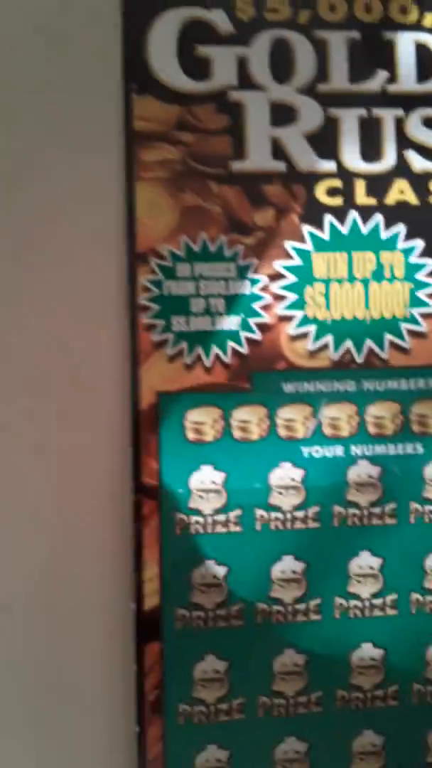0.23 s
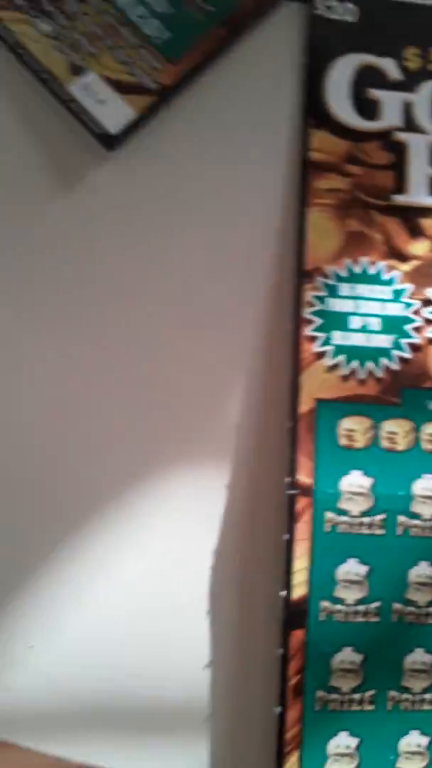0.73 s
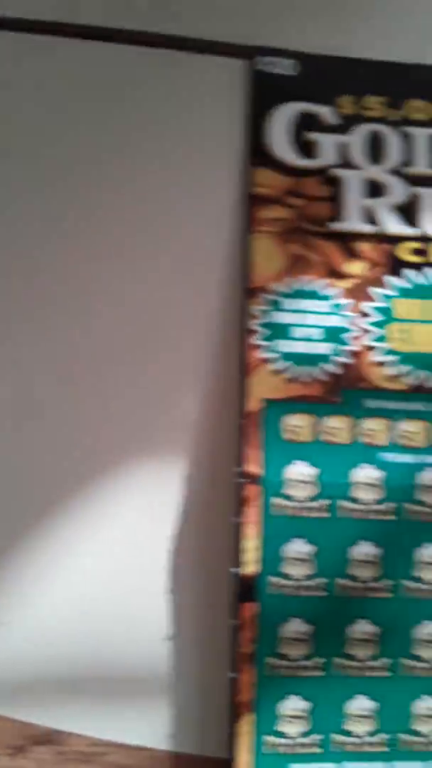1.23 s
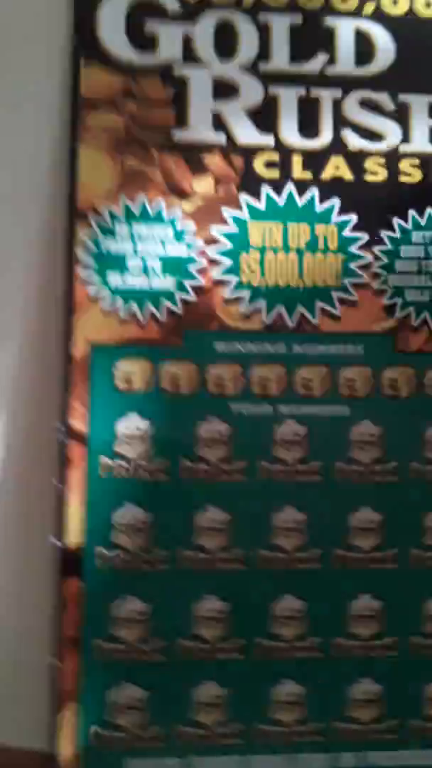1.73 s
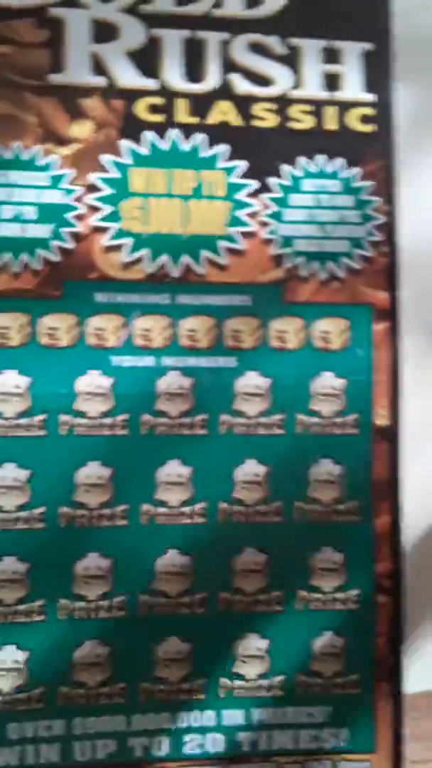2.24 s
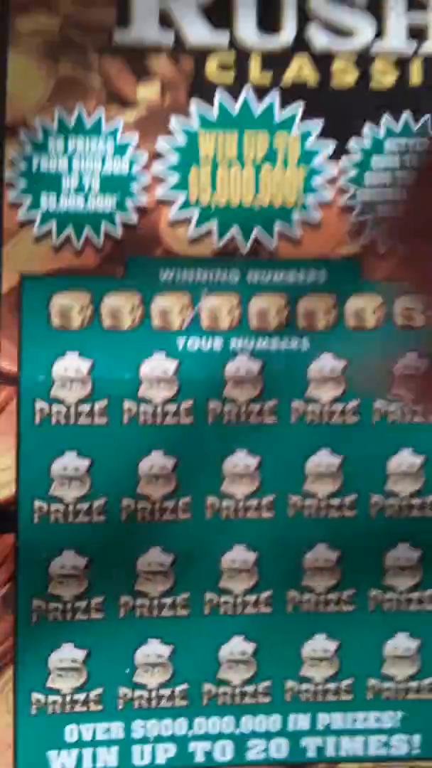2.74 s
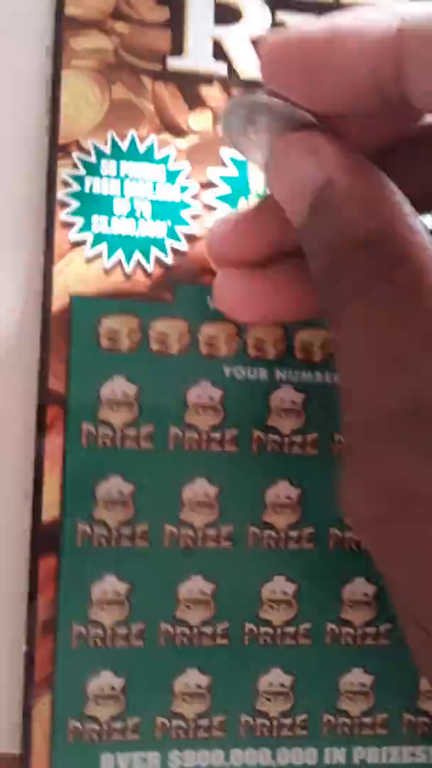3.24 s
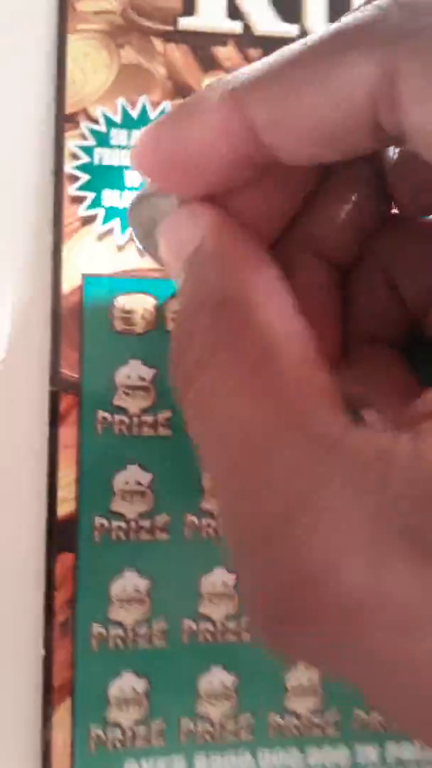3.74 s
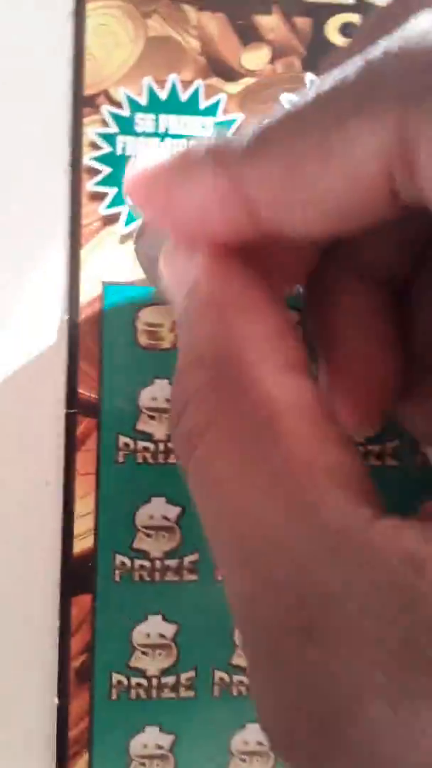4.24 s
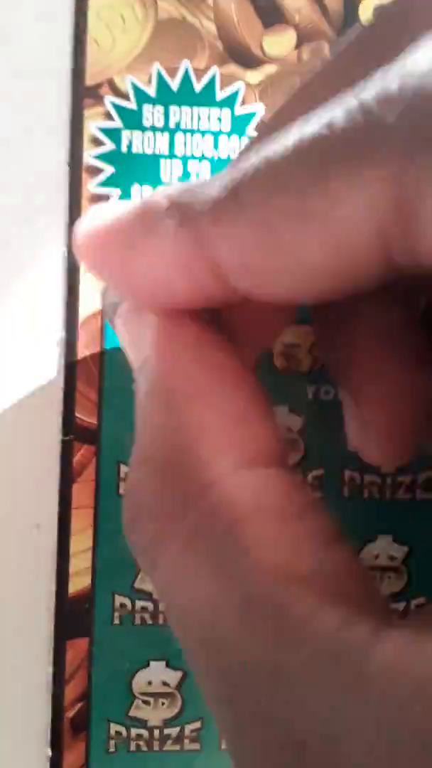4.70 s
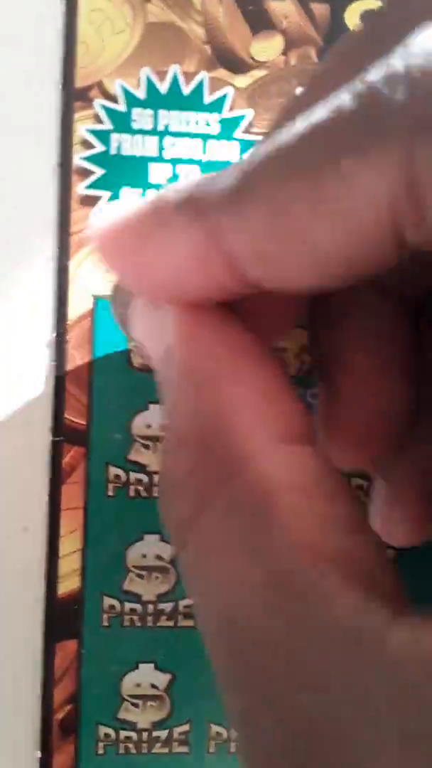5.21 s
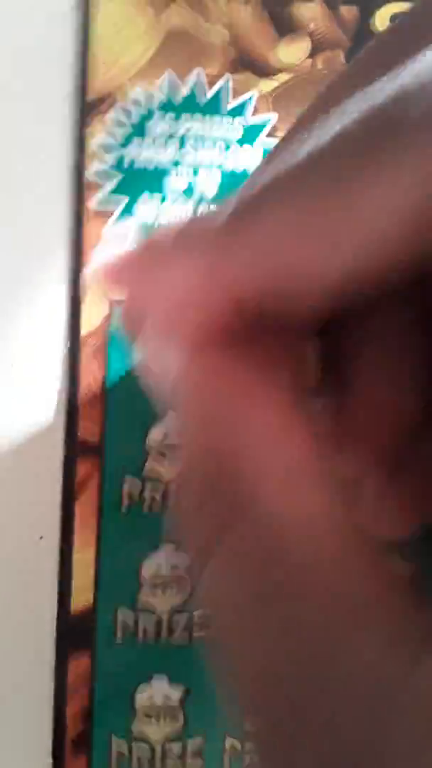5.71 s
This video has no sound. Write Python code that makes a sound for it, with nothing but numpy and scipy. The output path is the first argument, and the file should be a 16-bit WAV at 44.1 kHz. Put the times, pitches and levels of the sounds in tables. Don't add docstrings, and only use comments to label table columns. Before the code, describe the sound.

Close card handling with a loud crackly slide, a distant metallic knock, then rapid gritty coin scraping over a faint low room hum.

```python
import sys
import numpy as np
from scipy import signal
from scipy.fft import rfft, irfft
from scipy.io import wavfile
from scipy.ndimage import uniform_filter1d

SR = 44100
rng = np.random.default_rng(int(sys.argv[2]) if len(sys.argv) > 2 else 0)


def inscribe(sig):
    pcm = np.round(np.clip(np.atleast_2d(sig).T, -1, 1) * 32767)
    wavfile.write(sys.argv[1], SR, pcm.astype(np.int16))


def decibels_to_gain(level_db):
    exponent = np.asarray(level_db, float) / 20
    return 10 ** exponent


N = 262880


def evened(x):
    return x / np.sqrt(np.mean(x ** 2) + 1e-20)


def read(points, hz):
    f, value = np.transpose(points)
    return np.interp(np.log(hz + 1), np.log(f + 1), value)


def add(mix, s, sound):
    part = mix[..., round(s * SR):][..., :sound.shape[-1]]
    part += sound[..., :part.shape[-1]]


def panned(db):
    return decibels_to_gain([[db / 2], [-db / 2]])


def bands(x, spectrum, edges_hz):
    hz = np.fft.rfftfreq(x.shape[-1], 1 / SR)
    below = [0 * hz] + [1 / (1 + (hz / e) ** 30) for e in edges_hz] + [1 + 0 * hz]
    z = rfft(x) * decibels_to_gain(read(spectrum, hz))
    return [evened(irfft(z * np.sqrt(abs(b - a)), x.shape[-1])) for a, b in zip(below, below[1:])]


def follow(x, hz, width):
    turn = np.exp(2j * np.pi * np.cumsum(hz + np.zeros(x.shape[-1])) / SR)
    r = np.exp(-np.pi * width / SR)
    return (turn * signal.lfilter([np.sqrt(1 - r * r)], [1, -r], x / turn)).real


def hollow(x, hz, width):
    return follow(follow(x, hz, width), hz, width)


def ring(x, modes):
    out = np.zeros((2, len(x)))
    for hz, width, db, pan_db, lag in modes:
        pole = np.exp((2j * np.pi * hz - 1.5 * np.pi * width) / SR)
        z = signal.lfilter([(1 - abs(pole)) ** 2], [1, -2 * pole, pole ** 2], x + 0j) * decibels_to_gain(db)
        left, right = z.imag, (z * np.exp(-1j * lag)).imag
        out += [left * decibels_to_gain(pan_db / 2), right / decibels_to_gain(pan_db / 2)]
    return out


def grit(per_s, spread_db, lumps_db, lump_ms):
    clicks = (rng.random(N) < per_s / SR) * rng.standard_normal(N)
    clicks *= decibels_to_gain(spread_db * np.minimum(rng.exponential(1, N), 4))
    lump = signal.windows.hann(max(round(lump_ms * SR / 1000), 3))
    lumps = evened(signal.oaconvolve(rng.standard_normal(N), lump, "same"))
    return evened(clicks * decibels_to_gain(lumps_db * lumps))


def swell(peak_s, rise_ms, fall_ms, db):
    t = np.arange(-2 * rise_ms, 2 * fall_ms, 1000 / SR)
    t = t[t >= -1000 * peak_s]
    return peak_s + t[0] / 1000, db - 20 * np.maximum(-t / rise_ms, t / fall_ms)


# (frequency [Hz], likeness [0-1])
LIKENESS = [(60, 1), (150, 0.89), (290, 0.57), (600, 0.18), (2000, 0)]


def paired(z1, z2, hz):
    same = np.clip(read(LIKENESS, hz), 0, 1)
    return np.array([z1, same * z1 + np.sqrt(1 - same ** 2) * z2])


# (frequency [Hz], density [dB per Hz])
HISS = [(24, -36.5), (40, -23.5), (110, -8.5), (200, -15), (320, -19), (600, -20.5), (1200, -27),
        (2500, -29.5), (4400, -33), (7000, -42), (8700, -36), (10500, -38), (14000, -32), (15800, -33)]
# (frequency [Hz], width [Hz], level [dB rms])
DUCT = [(56, 7.7, -72), (99.7, 7.74, -73.5), (150.6, 20.4, -74)]
# (time [s], level [dB])
DUCT_TONE = [(0.0, -53.5), (0.2, -51), (0.3, -62), (0.8, -55), (1.31, -66), (2.39, -56.5), (2.61, -68),
             (2.67, -55.5), (3.1, -90), (3.27, -55.5), (3.39, -87), (3.5, -59), (3.93, -59.5),
             (3.97, -68.5), (5.0, -57.5), (5.26, -69), (5.29, -57.5), (5.96, -59.5)]


def floor():
    hiss_db, tone_hz, waver_hz, waver_db = -64, 142.7, 3.76, 2.4
    hz = np.fft.rfftfreq(N, 1 / SR)
    a, b, c, d = rng.standard_normal((4, len(hz)))
    z = paired(a + 1j * b, c + 1j * d, hz)
    hiss = z * decibels_to_gain(read(HISS, hz))
    hiss *= decibels_to_gain(hiss_db) / np.std(irfft(hiss * (hz > 300), N))
    hum = sum(decibels_to_gain(db) * evened(irfft(z / (1 + 4 * ((hz - f) / w) ** 2), N)) for f, w, db in DUCT)
    waver = uniform_filter1d(rng.standard_normal(N), size=1500)
    waver = evened(uniform_filter1d(waver, size=1500))
    tone = np.sqrt(2) * np.sin(2 * np.pi * np.cumsum(tone_hz + waver_hz * waver) / SR)
    s, db = np.transpose(DUCT_TONE)
    tone_db = np.interp(np.arange(N) / SR, s, db) + waver_db * np.roll(waver, N // 2)
    return irfft(hiss, N) + (hum + tone * decibels_to_gain(tone_db)) * panned(2.2)


# (peak time [s], rise [ms], fall [ms], level [dB], fine hiss over it [dB])
RUBS = [(0.002, 18, 42, -41, -4.5), (0.032, 54, 27, -47.5, 0), (0.1, 92, 49, -48.5, -1.5),
        (0.25, 240, 250, -62, -11), (0.304, 23, 26, -51.5, -16), (1.831, 26, 48, -51, -8),
        (1.904, 15, 190, -57.5, -12), (2.112, 35, 41, -61.5, -6), (2.288, 230, 550, -64.5, -19),
        (2.76, 260, 200, -63.5, -8.5), (2.918, 52, 130, -73, 6.5), (3.101, 34, 83, -63, -4),
        (3.274, 53, 110, -59, -14), (3.33, 75, 94, -63.5, 4), (3.396, 110, 27, -59, -12)]
# (peak time [s], rise [ms], fall [ms], level [dB], fine hiss over it [dB], hollow [Hz])
WHISKS = [
    (0.161, 7, 95, -54, 6.5, 6500),
    (0.255, 62, 55, -60, 1, 5900),
    (0.738, 14, 24, -54, 0, 7000),
    (2.112, 35, 14, -57.5, -6, 4800),
    (2.15, 25, 18, -68.5, 3, 4300),
    (2.278, 12, 20, -75, 8, 6000),
]
# (time [s], fall [ms], level [dB], fine hiss over it [dB], hollow [Hz])
CATCHES = [
    (0.724, 39, -39, -3, 3550),
    (0.749, 18, -49, -2, 3500),
    (0.762, 92, -56, -16, 3550),
    (0.988, 17, -32, -3.5, 6300),
    (1.118, 29, -34, -16, 2250),
    (0.918, 29, -32, -8.5, 2680),
    (0.943, 41, -30, -5.5, 2620),
]
# (time [s], level [dB], hollow [Hz])
SLIDE = [
    (0.819, -54.5, 3640),
    (0.866, -42, 3550),
    (0.91, -46.5, 3230),
    (0.978, -41.5, 3500),
    (0.986, -31, 4470),
    (1.027, -27.5, 5900),
    (1.065, -26, 6360),
    (1.151, -34, 3520),
    (1.225, -51.5, 4010),
]
# (thud [dB], low-mid [dB], hollow [dB], thud and low-mid growth [dB per dB])
HELD, CAUGHT, DRAGGED = (-10.5, -9.5, -20, 1), (-21, -26, -6, 0.5), (-18, -13, -23, 0.7424)
BRUSHED = (-20, -28, -0.5, 6)


def moves():
    grip_hz, catch_rise_ms = 3700, 1.7 / 2
    out = [(*swell(s, rise, fall, db), grip_hz, fine, HELD) for s, rise, fall, db, fine in RUBS]
    out += [(*swell(s, rise, fall, db), hz, fine, BRUSHED) for s, rise, fall, db, fine, hz in WHISKS]
    out += [(*swell(s, catch_rise_ms, fall, db), hz, fine, CAUGHT) for s, fall, db, fine, hz in CATCHES]
    s, db, hz = np.transpose(SLIDE)
    t = np.arange(s[0], s[-1], 1 / SR)
    hz = np.interp(t, s, hz)
    fine_db = -10.5 + 3.54 * (hz / 1000 - 3.5)
    return out + [(s[0], np.interp(t, s, db), hz, fine_db, DRAGGED)]


# (frequency [Hz], density [dB per Hz])
RUSTLE_COLOUR = [(88, -20.5), (150, -18), (209, -28), (398, -16), (637, -21.5), (923, -10.5), (1040, -15.5),
                 (1310, -13), (1530, -18.5), (1780, -13.5), (1960, -1), (3550, 3.5), (6640, 1), (8230, -19),
                 (11500, -18.5), (16000, -25.5)]


def rustle():
    shared = grit(12000, 0.5, 3.8, 13.6)
    rub = np.array([np.roll(shared, lag) + 2.2 * grit(12000, 0.294, 0.71, 12.2) for lag in (0, 24)])
    thud, low, body, fine = bands(rub, RUSTLE_COLOUR, [600, 1750, 7900])
    out = np.zeros((2, N))
    for s, db, hz, fine_db, (thud_db, low_db, hollow_db, growth) in moves():
        at = slice(round(s * SR), round(s * SR) + len(db))
        mix = 0.7 * body[:, at] + decibels_to_gain(hollow_db) * evened(hollow(body[:, at], hz, 1000))
        under = decibels_to_gain((growth - 1) * (db + 50))
        mix += (thud[:, at] * decibels_to_gain(thud_db) + low[:, at] * decibels_to_gain(low_db)) * under
        mix += fine[:, at] * decibels_to_gain(fine_db)
        add(out, s, mix * decibels_to_gain(db) * signal.windows.tukey(len(db), 200 / len(db)))
    return out * panned(3)


def cracks(rows, breadth, edge_db, fade_ms, longer):
    out, t = np.zeros((2, N)), np.arange(2048) / SR
    for s, db, hz, low_db, pan_db in rows:
        ms = fade_ms * decibels_to_gain(longer * (db + 40))
        crack = rng.standard_normal((2, 2048)) * np.exp(-t * 1000 / ms) * (1 - np.exp(-t * 2500))
        edge = signal.lfilter([1, 0, -1], [1], crack) * decibels_to_gain(edge_db)
        crack = 1.17 * hollow(crack, hz, breadth * hz) + edge
        push = np.sin(2 * np.pi * 700 * t) * np.exp(-t / 0.00045)
        add(out, s, decibels_to_gain(db) * (crack / abs(crack).max() * panned(pan_db) + decibels_to_gain(low_db) * push))
    return out * decibels_to_gain(2.0)


# (time [s], peak [dB], centre
# [Hz], low push over it [dB], left-right [dB])
SNAPS = [(0.0314, -41.5, 3420, 7, 14), (0.2955, -34, 6050, -13, 5), (0.7235, -36, 3420, -35, 19),
         (0.7544, -41, 3470, -9, 17), (0.9192, -29.5, 2480, -47, 7), (0.9425, -29, 2550, -42.5, 11),
         (0.9873, -21, 6400, -41.5, 2), (1.0579, -13, 6460, -45, -1), (1.1181, -24, 2390, -38.5, -5),
         (1.2394, -40, 4430, 5, -10), (0.2957, -39, 2500, -1, 5), (1.3855, -46, 2000, 10, 0),
         (1.5085, -44, 2600, -2.5, 1.5), (1.824, -40, 1505, -0.5, 5.5), (1.9054, -39.5, 2040, 1.5, -3),
         (1.9345, -45, 3520, -28, -2), (3.0943, -49, 2970, 4.5, -3), (3.271, -49.5, 3280, -11, 8.5),
         (3.2805, -44, 4130, -12, -6), (3.5216, -46.5, 6200, -26, 5)]


def snaps():
    return cracks(SNAPS, breadth=0.46, edge_db=-12.0, fade_ms=2.3, longer=0.34)


def boom(rows, modes, rise_ms):
    mode, level = evened(ring(rng.standard_normal(N), modes)), np.zeros(N)
    for s, db, fall_ms in rows:
        start, line_db = swell(s, rise_ms, fall_ms, db)
        add(level, start, decibels_to_gain(line_db))
    return mode * level


# (peak time [s], level [dB], fall [ms])
ROCKS = [(0.038, -40.5, 51), (0.126, -48.5, 80), (0.3, -58, 37), (4.368, -57.5, 68), (4.54, -56.5, 94),
         (4.71, -54, 200), (4.89, -57.5, 60), (5.058, -53, 78), (5.2, -59, 110), (5.3, -67, 61),
         (5.4, -59.5, 230), (5.576, -48.5, 46), (5.756, -47, 44), (5.94, -48, 31)]
# (peak time [s], level [dB], fall [ms])
BUMPS = [
    (0.035, -43.5, 41),
    (0.775, -53.5, 25),
    (0.868, -49.5, 45),
    (0.925, -54.5, 22),
    (1.02, -48.5, 23),
    (1.115, -54.5, 44),
    (1.83, -59.5, 67),
    (0.3, -55, 38),
    (3.25, -63.5, 32),
    (4.15, -52, 56),
]


def table_top():
    rock = boom(ROCKS, [(297, 84, 0, 8.3, 1.0)], rise_ms=56)
    return rock + boom(BUMPS, [(453, 350, 0.0043, 2.4, 0.55), (255, 41, 0.0063, 1.8, 0.37)], rise_ms=20)


# (time [s], level [dB], pitch [Hz])
SQUEAK = [
    (0.16, -72, 3320),
    (0.18, -58, 3400),
    (0.215, -56, 3550),
    (0.232, -65, 3360),
    (0.25, -56, 3240),
    (0.29, -65, 3280),
]


def squeak():
    s, db, hz = np.transpose(SQUEAK)
    t, out = np.arange(s[0], s[-1], 1 / SR), np.zeros((2, N))
    whistle = hollow(rng.standard_normal((2, len(t))), np.interp(t, s, hz), 280)
    add(out, s[0], evened(whistle) * decibels_to_gain(np.interp(t, s, db)))
    return out


# (time [s], peak [dB], centre [Hz], low push over it [dB], left-right [dB])
TICKS = [
    (0.1989, -38, 11800, -31, 16),
    (0.6215, -41, 13400, -30.5, 11),
    (5.4874, -49, 7600, -1, 5),
    (5.7275, -34, 13320, -14, -1),
    (5.8894, -43, 11370, 1, 1),
]


def ticks():
    return cracks(TICKS, breadth=0.88, edge_db=-17.0, fade_ms=0.65, longer=0.05)


# (time [s], peak [dB], dull modes over main [dB], bright modes over main [dB], left-right [dB])
CLICKS = [
    (3.8093, -25.5, -5, -5, 7.5),
    (5.8725, -25, -28, -3.5, -6),
    (5.6605, -38, -16, 6.5, 5),
    (0.71, -37, -4.5, 0, 6.5),
    (1.5, -46.5, 8, -8, 4),
    (1.9065, -42, 4.5, -8, 3),
    (5.5323, -49, -4, -10, 4),
    (5.4276, -48, 5, -8, 3),
]
# (frequency [Hz], width [Hz], level [dB], left-right [dB], right side's lag [rad])
CLICK_MAIN = [(5800, 460, -7.5, 0, .5), (6430, 740, 3, 0, .7), (7180, 360, -4.5, 0, 1)]
CLICK_DULL = [(2000, 700, -10, 0, .3), (2800, 500, -5.5, 0, 0.43), (4040, 700, 1, 0, .6)]
CLICK_BRIGHT = [(9500, 810, 0, 0, 0.89), (11740, 1100, 1, 0, 1), (14400, 1500, -3, 0, 2)]


def clicks():
    out, kick = np.zeros((2, N)), signal.unit_impulse(512)
    rings = [ring(kick, modes) for modes in (CLICK_MAIN, CLICK_DULL, CLICK_BRIGHT)]
    main, dull, bright = [v / abs(v).max() for v in rings]
    for s, db, dull_db, bright_db, pan_db in CLICKS:
        click = main + dull * decibels_to_gain(dull_db) + bright * decibels_to_gain(bright_db)
        add(out, s, click * decibels_to_gain(db - 6) * panned(pan_db))
    return out


# (time [s], peak [dB], centre [Hz], low push over
# it [dB], left-right [dB])
FLAKES = [(5.256, -50, 2800, -30, 3), (5.3513, -50, 2800, -28, 2), (8.5, -48.5, 2700, -32, 5),
          (4.9, -54, 2800, -30, -3), (5.5323, -54, 3600, -30, 4), (5.4465, -50, 2810, -27, 3),
          (6.8, -44, 3100, -33, 6), (3.7, -54, 3200, -30, 0), (3.8105, -42.5, 4700, -27.5, 5.5),
          (4.4368, -48, 3300, -30, 2), (3.6, -48, 3600, -28, 5), (6.1, -44, 2700, -30, 12),
          (5.3, -48, 3040, -30, 5), (5.0909, -47, 2850, -30, 1), (6.7, -47, 3400, -30, 5),
          (0.825, -49, 2300, -28.5, 4), (1.3, -48, 3600, -29, -0.5), (0.991, -32, 1900, -39.5, 5),
          (1.1215, -28, 2330, -43, 7)]


def flakes():
    return cracks(FLAKES, breadth=0.27, edge_db=-38.0, fade_ms=1.2, longer=0.05)


# (time [s], peak [dB], middle over it [dB], treble over it [dB], body [Hz])
KNOCKS = [
    (1.384, -43.5, -1, -32.5, 770),
    (1.439, -44.5, -26, -19, 750),
    (1.508, -32.5, -8, -21.5, 770),
    (2.478, -29.5, -0.5, -4.5, 630),
]
# (frequency [Hz], density [dB per Hz])
KNOCK_COLOUR = [(88, -56.5), (150, -22), (197, -11), (601, 2), (854, -0.5), (1500, -8), (2100, -10.5),
                (2980, -13), (3800, -16.5), (4500, -17.5), (8730, -24.5), (14200, -26), (16000, -28)]
# (frequency [Hz], width [Hz], level [dB], left-right [dB], right side's lag [rad])
SHELF = [(1480, 110, -6, 0, 1), (2062, 100, 1, 0, 1), (3042, 120, -1, 0, 2), (3850, 150, -8, 0, 1),
         (4210, 90, -4, 0, 0), (600, 170, 1, 0, 0)]


def knocks():
    out, t = np.zeros((2, N)), np.arange(8192) / SR
    for s, db, mid_db, top_db, hz in KNOCKS:
        low, mid, top = bands(rng.standard_normal((2, 8192)), KNOCK_COLOUR, [1500, 4200])
        body = -0.0063 * top_db * 1.3 * follow(low, hz, 110) * np.exp(-t / 0.05)
        blow = 0.75 * low + body + mid * decibels_to_gain(mid_db) + top * decibels_to_gain(top_db)
        add(out, s, decibels_to_gain(db) * blow * np.exp(-t / 0.039))
    half = SR // 2
    fade = signal.windows.hann(SR)[half:] ** 0.5 * np.exp(-np.arange(half) / SR / 0.13)
    add(out, KNOCKS[-1][0], decibels_to_gain(-24) * ring(rng.standard_normal(half) * fade, SHELF))
    return out * decibels_to_gain(-6.5)


# (time [s], length [ms], card ring [dB], scrape [dB])
TOUCHES = [
    (4.0, 34, -67.5, -80),
    (4.09, 12, -73, -84),
    (4.128, 38, -55.5, -66),
    (4.176, 22, -61, -80),
    (4.252, 11.7, -51, -66.5),
    (4.269, 17, -57, -66.5),
    (4.339, 50, -54.5, -66.5),
]
# (time [s], length [ms], card ring [dB], scrape [dB])
STROKES = [(4.429, 41, -45, -62.5), (4.513, 32, -50, -58), (4.595, 40, -44, -60.5), (4.624, 23, -51, -66),
           (4.68, 13, -46, -59.5), (4.691, 36, -51, -62), (4.769, 9.9, -48, -60), (4.792, 16, -45, -65.5),
           (4.842, 38.4, -47.5, -61), (4.928, 12, -41, -65.5), (4.947, 29, -61, -67),
           (5.017, 35, -44.5, -60), (5.093, 56, -37, -60.5), (5.188, 16.6, -40.5, -62),
           (5.204, 25, -43, -59.5), (5.268, 58, -42, -60.5), (5.287, 13, -45, -75),
           (5.355, 45, -43.5, -62.5), (5.419, 59, -70, -68), (5.468, 17, -51, -64), (5.546, 16, -38, -55),
           (5.569, 10, -36, -66), (5.622, 45, -48.5, -66.5), (5.704, 71, -45, -60), (5.8, 46, -50, -65),
           (5.881, 32, -47, -64), (5.901, 35, -42.5, -58.5), (5.946, 14.2, -52, -81)]


def stroke_pressure(group, lead_s, taper):
    pressure = np.zeros(N)
    for s, ms, ring_db, scrape_db in TOUCHES + STROKES:
        firm_db = scrape_db + 60
        thud_db = -55.5 + firm_db - 2.5 * (s - 5) + 2 * (s < STROKES[0][0])
        fine_db = -64 + 1.5 * firm_db
        db = [ring_db - 4.5, thud_db, scrape_db, fine_db][group]
        stroke = signal.windows.tukey(round(ms * SR / 1000), taper)
        add(pressure, s - lead_s, stroke * decibels_to_gain(db + 3.5))
    return pressure


# (time [s], card ring peak [dB], table over it [dB], scrape over it [dB])
GRABS = [(4.016, -60, 3, -8), (4.1425, -62, 12.5, -16), (4.255, -61, -7, -8), (4.3439, -58, 2, -15),
         (4.3717, -49, -11, -17), (4.4292, -54, -10, -4), (4.444, -42, -10, -5), (4.4581, -40, -12, -16),
         (4.4706, -44, -7, -20), (4.5196, -44, -8, -21), (4.5348, -49.5, 8, -18), (4.6055, -39, -15, -27),
         (4.599, -42.5, -16, -18), (4.6346, -51, -5, -16), (4.6822, -43, -4, -1), (4.7028, -50, 4, -10),
         (4.721, -50, 2, -14), (4.7696, -44, -7, -21), (4.794, -39, -6, -30), (4.8468, -47, -9, -24),
         (4.8575, -49, -6, -25), (4.879, -49, -6, -17), (4.9314, -43, -14, -18), (5.0157, -54.5, 0, 1),
         (5.035, -40, -13, -29), (5.051, -45, -6, -13), (5.103, -43, -28, -4), (5.1145, -43, -31, -10),
         (5.1313, -41, -13, -14), (5.1952, -38, -19, -14), (5.219, -39, -4.5, -27), (5.2783, -36, -16, -15),
         (5.2916, -37, -16, -24), (5.3636, -42, -8, -24), (5.3826, -46.5, -1, -24), (5.454, -51, -20, -14),
         (5.4784, -41, -22, -17), (5.5315, -48.5, -3, 1), (5.5517, -35, -16, -34), (5.5702, -38, -15, -26),
         (5.6336, -49, -6, -15), (5.711, -46, -3, -21), (5.725, -47, -8, 1), (5.7478, -38, -11, -19),
         (5.763, -38.5, -10, -27), (5.805, -39.5, -36, -3), (5.8254, -48, -21, -21), (5.885, -46, -4, -10),
         (5.91, -37.5, -16, -7), (5.9284, -37.5, -19, -21)]
GRAB_MS, GRAB_TRIM_DB = 11.5, (-2.5, -2, -9.5)


def grab_pressure(group):
    pressure, push = np.zeros(N), signal.windows.hann(round(GRAB_MS * SR / 1000))
    for s, db, *over_db in GRABS:
        add(pressure, s, push * decibels_to_gain(db + over_db[group - 1] + GRAB_TRIM_DB[group]))
    return pressure


def grab_ring():
    kick, out = signal.windows.hann(12), np.zeros((2, N))
    note = ring(np.pad(kick, (0, 2048)), CARD)
    note = note * (1 - np.exp(-np.arange(note.shape[1]) / SR / 0.002))
    for s, db, *_ in GRABS:
        add(out, s, note / abs(note.mean(0)).max() * decibels_to_gain(db + GRAB_TRIM_DB[0]))
    return out


# (time [s], level [dB])
ANGLE = [(4.0, 2), (4.4, -1), (4.55, 0.5), (4.7, -1), (4.85, 0.5), (5.0, -1.5), (5.12, -0.5), (5.21, -1),
         (5.3, -1.5), (5.4, 0.5), (5.56, -1), (5.74, -1), (5.96, -1.5)]
COIN_FROM_S = 3.9


def scraped(x, modes):
    if modes is not SCRAPE:
        return ring(x, modes)
    s, db = np.transpose(ANGLE)
    angle_db = np.interp(COIN_FROM_S + np.arange(len(x)) / SR, s, db)
    return ring(x, modes[:3]) + ring(x * decibels_to_gain(angle_db), modes[3:])


# (frequency [Hz], width [Hz], level [dB], left-right [dB], right side's lag [rad])
CARD = [(1388, 72, -8, -2, -0.5), (1530, 41, -5, 1, 4), (1709, 78, 6, -3, 2), (2040, 165, -14.5, -6, 4.5),
        (2130, 270, -23, 6, 3.5)]
TABLE = [(434, 350, -14.5, 17, 0.17), (593, 204, 3.5, -1.5, 2.17), (770, 197, -1.5, 22.5, 5.7),
         (1044, 80, 7, 4.5, 1.75)]
SCRAPE = [(2340, 580, 1.2, 15, -12), (2840, 130, 11, 5.9, 2.2), (3240, 760, 8.2, 3, 0.5),
          (4330, 630, 2, 2, 8), (5900, 4100, 6.6, 4, 1.5)]
FINE = [(11100, 1000, -2, -1, 1), (12500, 1300, -4, 0, 2), (14200, 1500, -1, -1, 0), (15500, 800, -3, 0, 1)]


def coin():
    groups, drag = [], grit(10000, 1.3, 2.3, 8.0)
    first = round(COIN_FROM_S * SR)
    lead_s = [0.004, 0.003, 0.001, 0.001]
    taper = [0.7, 0.7, 0.7, 0.45]
    for k, modes in enumerate([CARD, TABLE, SCRAPE, FINE]):
        slips = evened(drag + grit(6000, 1.8, 2.2, 4.0))
        pressure = stroke_pressure(k, lead_s[k], taper[k])
        if k in (1, 2):
            pressure += grab_pressure(k)
        energy = np.sum(ring(signal.unit_impulse(4096), modes) ** 2) / 2
        sound = scraped((slips * pressure)[first:], modes) / np.sqrt(energy)
        groups.append(np.pad(sound, [(0, 0), (first, 0)]))
    card, table, scrape, fine = groups
    card = card + grab_ring()
    return card + table + scrape + fine, (card + fine) * decibels_to_gain(-21) + (table + scrape) * decibels_to_gain(-5.5)


# (frequency [Hz], t60 [s])
ROOM_DECAY = [(250, 0.29), (660, 0.35), (1740, 0.53), (4590, 0.44), (12100, 0.32)]


def room(x):
    taps = np.zeros((2, SR))
    at = np.arange(120, SR - 20, 20) + rng.integers(0, 20, (2, (SR - 121) // 20))
    np.put_along_axis(taps, at, rng.choice([-1., 1.], at.shape), 1)
    hz, t, z = signal.stft(taps, SR, nperseg=256)
    tail = signal.istft(z * decibels_to_gain(-60 * t / read(ROOM_DECAY, hz)[:, None]), SR, nperseg=256)[1]
    tail[:, :100] = 0
    return signal.fftconvolve(x, tail / np.linalg.norm(tail[0]), axes=1)[:, :N]


def long_waves(x):
    mid, side = x.mean(0), (x[0] - x[1]) / 2
    hz = np.fft.rfftfreq(N, 1 / SR)
    unlike = 1 / (1 + (430 / (hz + 1)) ** 3)
    side = irfft(rfft(side) * unlike + rfft(mid) * 0.13 * (1 - unlike), N)
    return np.array([mid + side, mid - side])


def scene():
    near = rustle() + squeak()
    sharp = snaps() + ticks() + clicks() + flakes()
    far = knocks()
    scratch, scratch_wet = coin()
    wet = near * decibels_to_gain(-9.5) + sharp * decibels_to_gain(-12.0) + scratch_wet + far * decibels_to_gain(-4.5)
    return long_waves(near + sharp + scratch + table_top() + far + room(wet)) + floor()


# (frequency [Hz], width [Hz], depth [dB])
PORT_NOTCH = (8750, 800, -4)


def microphones(x):
    low_hz, high_hz = 45, 15950
    hz = np.fft.rfftfreq(N, 1 / SR)
    band = 1 / np.sqrt(1 + (low_hz / (hz + 1)) ** 8) / (1 + (hz / high_hz) ** 200)
    notch_hz, width, db = PORT_NOTCH
    band *= decibels_to_gain(db * np.exp(-((hz - notch_hz) / width) ** 2))
    return irfft(rfft(x) * band, N)


def band_limit(x):
    return signal.sosfilt(signal.butter(12, 16710, fs=SR, output="sos"), x)


def record(dry):
    mix = microphones(dry)
    return band_limit(mix)


dry = scene()
out = record(dry)
inscribe(out)
```